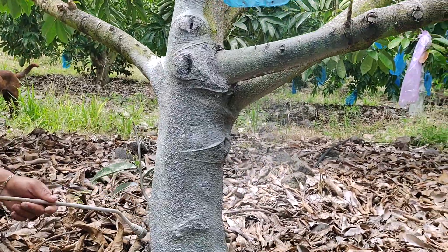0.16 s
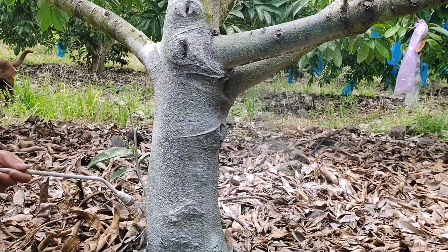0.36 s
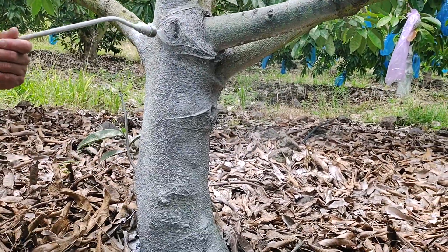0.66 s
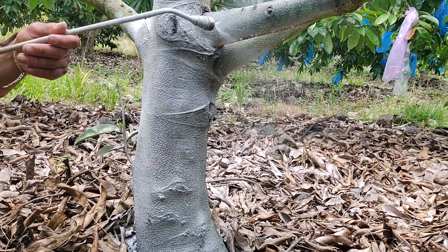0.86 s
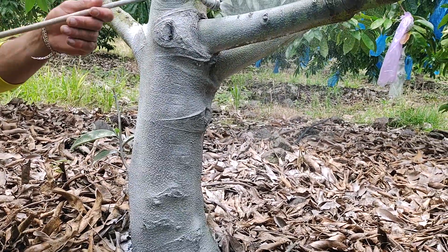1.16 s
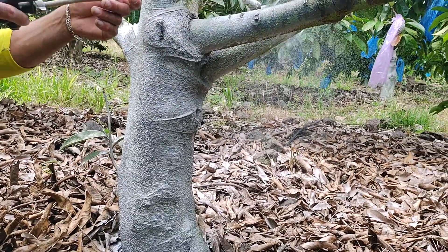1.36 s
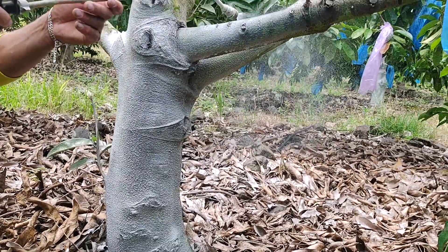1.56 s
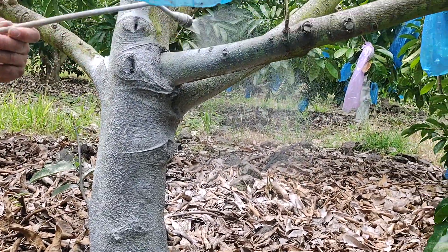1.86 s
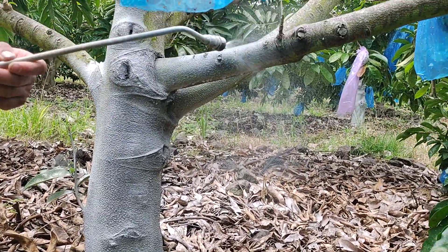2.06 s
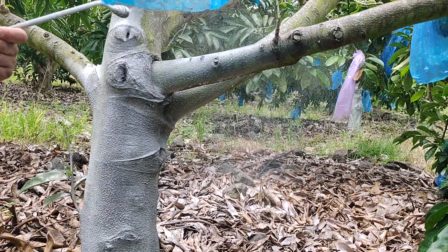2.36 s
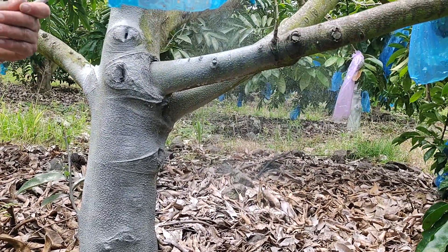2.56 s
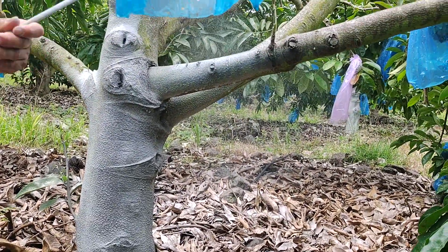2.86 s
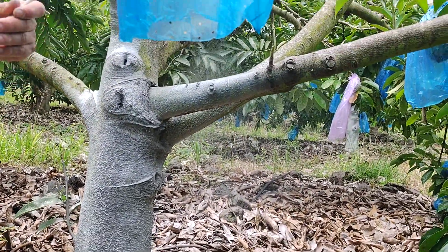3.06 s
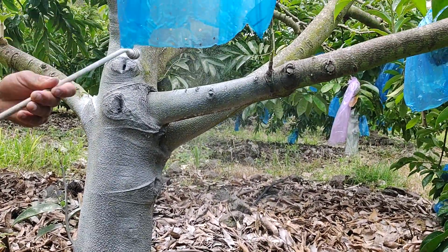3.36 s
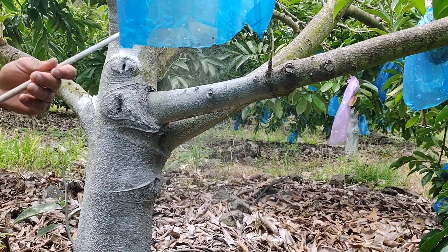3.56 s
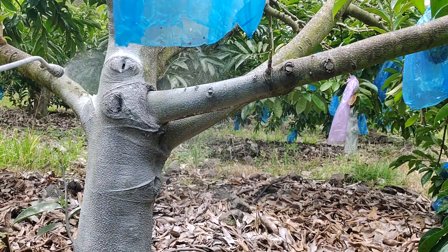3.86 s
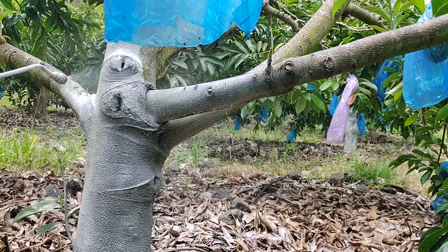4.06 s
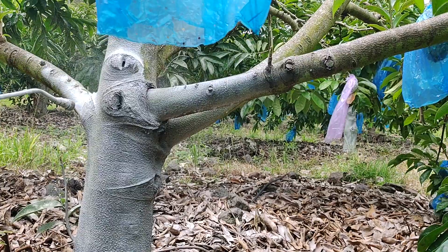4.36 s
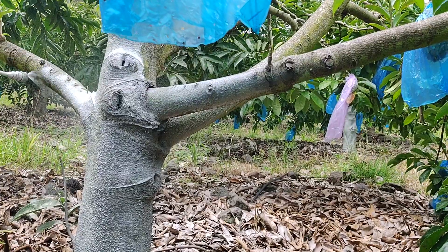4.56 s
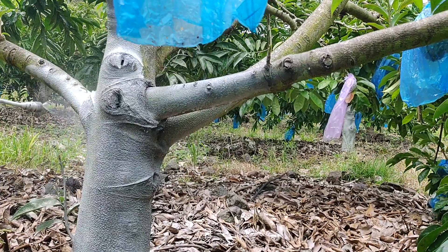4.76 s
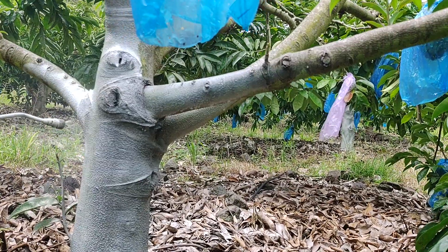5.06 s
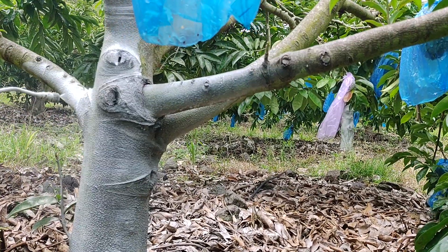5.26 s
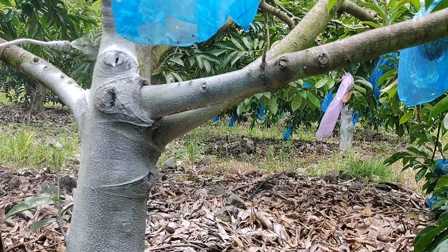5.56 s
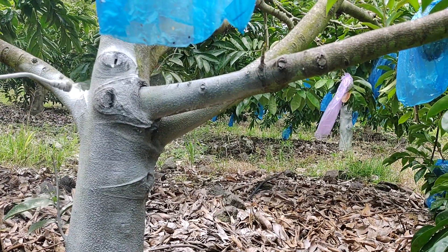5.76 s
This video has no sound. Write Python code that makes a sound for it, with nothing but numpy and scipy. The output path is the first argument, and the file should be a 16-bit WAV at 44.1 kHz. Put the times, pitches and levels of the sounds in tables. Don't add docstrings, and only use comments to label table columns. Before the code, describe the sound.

A hand-held sprayer hisses in uneven, close spurts over tree bark and dry leaves, with small cracks, drips and a few sharp valve snaps outdoors.

```python
import sys
import numpy as np
from scipy import signal
from scipy.fft import rfft, irfft, next_fast_len
from scipy.io import wavfile
from scipy.ndimage import uniform_filter1d, map_coordinates

SR = 44100
rng = np.random.default_rng(int(sys.argv[2]) if len(sys.argv) > 2 else 0)


def master_out(mix):
    frames = np.transpose(np.atleast_2d(mix))
    ceiling = np.clip(frames, -1, 1)
    pcm = np.round(ceiling * 32767).astype(np.int16)
    wavfile.write(sys.argv[1], SR, pcm)


def to_linear_factor(level_db):
    exponent = np.asarray(level_db, float) / 20
    return 10 ** exponent


N = 260190

# (frequency [Hz], density [dB per Hz])
RUMBLE = [(12, -51), (22, -26), (43, -13), (112, -2), (224, -8.5), (290, -13), (400, -18.5), (738, -15.5),
          (1300, -20.5), (2400, -33.5), (3600, -76)]
# (frequency [Hz], left-right likeness [0-1])
RUMBLE_ALIKE = [(30, 0.29), (60, 0.94), (130, 0.91), (290, 0.88), (640, 0.28), (1200, 0.45)]
# (frequency [Hz], lead of the left port [rad])
RUMBLE_LEAD = [(150, 0), (430, 0.58), (700, 2), (1120, 4)]
# (time [s], flow [dB], aim at the bark [dB])
FLOW = [(0, -48, 8.5), (.06, -44, -1), (.4, -49, 3), (.62, -45, 5.5), (.8, -47, -0.5), (1.01, -45.5, 5),
        (1.18, -49.5, 0), (1.3, -46.5, 0.5), (1.69, -44.5, 2.5), (2.02, -46, 4.5), (2.42, -51.5, -1),
        (3.1, -54, 4), (3.76, -52.5, 0), (4.1, -52.5, 3), (4.38, -55.5, 9), (5.1, -48.5, 1.5),
        (5.71, -49, -4.5), (5.9, -49.5, 1.5)]
# (centre [s], rise [dB], half width [s], aim [dB])
SURGES = [(0.118, 6, 0.04, 4.5), (.19, 4, 0.012, -2), (.34, 2, 0.071, -10), (.47, 2.5, 0.085, -2),
          (.71, 6.5, 0.037, 2.5), (.87, 2, 0.02, 6), (1.36, 5.5, 0.043, -10), (1.44, 4.5, 0.042, -11),
          (1.611, 5.5, 0.026, -2), (1.755, 3.5, 0.077, -4), (1.83, 4, 0.088, -2.5), (1.919, 8, 0.042, -5),
          (1.971, 7.5, 0.032, -3.5), (2.1, 2, 0.014, -6), (2.21, 2, 0.016, -7), (2.75, 4, 0.052, 5),
          (3.2, 0.5, 0.015, -4), (3.32, 3.5, 0.041, 9), (3.488, 7.5, 0.033, 4.5), (3.6, 7.5, 0.13, 4),
          (3.891, 9, 0.086, 0.5), (4.009, 8, 0.049, 2), (4.22, 2, 0.047, -8), (4.608, 6, 0.11, -7.5),
          (4.85, 0.5, 0.028, -6), (5.26, 3.5, 0.082, 2), (5.36, 3.5, 0.04, 0.5), (5.52, 3.5, 0.11, 2.5),
          (5.817, 6, 0.042, -2)]
# (centre [s], loss [dB], half width [s])
SHADOWS = [(.3, 1, 0.081), (1.18, 3, 0.05), (2.55, 9, 0.15), (2.95, 1, 0.081), (3.25, 7, 0.04),
           (3.1, 5, 0.051), (3.76, 11, 0.026), (4.14, 4, 0.055), (4.37, 8, 0.083), (4.73, 10, 0.075),
           (4.93, 13, 0.076), (5.71, 9, 0.028), (4.54, 8, .04), (5.34, 6, 0.065)]
# (frequency [Hz], level [dB])
SHADOW_BAND = [(4600, -28), (5200, -16), (6300, 4), (7400, -20), (8300, -30), (11500, -30), (13000, 3),
               (14300, -30)]
# (time [s], lead [ms])
LEAD = [(0, .5), (.3, .48), (.42, .2), (1.2, .13), (1.3, .48), (2.05, .48), (2.2, .21), (3.8, .2),
        (3.95, .3), (5.1, .28), (5.25, .5), (5.9, .52)]
# (time [s], delay [ms], share [0-1])
MIRROR = [(0, 1.3, .15), (.8, 1.22, .2), (1.5, 1.5, .1), (2.5, 1.3, .35), (2.64, 1.04, .45),
          (3.02, 1.0, .5), (3.06, .57, .65), (3.3, .57, .6), (3.8, 1.1, .2), (4.3, .82, .3),
          (4.47, 1.0, .35), (4.75, 1.0, .3), (5.2, 1.2, .2), (5.9, 1.3, .2)]
# (frequency [Hz], density [dB per Hz])
DRUMMING = [(700, -17), (1050, -5), (1420, -3), (1540, 4), (1700, 2.5), (1850, 7), (2300, -14)]
# (frequency [Hz], density [dB per Hz])
SPATTER = [(1300, -66), (1750, -14), (2000, -5), (2400, -3), (3000, 0), (4200, 0.5), (5200, -4.5),
           (7500, -22)]
# (frequency [Hz], density [dB per Hz])
SWIRL = [(3200, -57), (4600, -4), (5500, 2), (7100, 4), (8300, 1.5), (10500, -15.5)]
# (frequency [Hz], density [dB per Hz])
MIST = [(6000, -22), (8200, -2), (9500, -1), (11000, -1), (13000, -2.5), (15000, 1), (15800, -5.5),
        (16000, -68)]
# (time [s], level [dB])
GRAZE = [(0, -5.5), (.5, -2.5), (.9, 1), (1.3, -1), (1.6, -1), (2.1, -2.5), (2.6, 1.5), (3.1, 2),
         (3.5, 0.5), (3.85, -3.5), (4.3, -0.5), (4.7, -3.5), (5.1, -0.5), (5.5, -0.5), (5.9, -0.5)]
# (frequency [Hz], level [dB])
GRAZE_BAND = [(2900, -33), (3250, 3.5), (3800, -1.5), (4600, 1), (5300, -28), (7000, -120)]
# (value at the usual flow [dB], per flow [dB/dB], per aim [dB/dB])
DRUMMING_LAW, SWIRL_LAW = (-60.5, 1.47, 0.88), (-48.5, 1.3, -0.39)
MIST_LAW, PAN_LAW = (-46, 0.96, -0.14), (5.9, -0.51, 0.18)
# (centre [s], half width [s], from [Hz], to [Hz], level [dB])
HOLLOWS = [(.12, .05, 2900, 2700, -55), (.33, .1, 2400, 2300, -59), (.7, .05, 2600, 2700, -55),
           (.98, .16, 1690, 1580, -56), (1.39, .065, 7300, 7400, -49), (1.62, .03, 7300, 7300, -53),
           (1.75, .035, 7300, 7400, -49), (.7, .03, 7000, 7400, -54), (1.7, .12, 2300, 2700, -52),
           (2.08, .07, 2620, 2600, -58), (2.18, .09, 2500, 2450, -58), (2.61, .07, 3750, 3950, -58),
           (2.84, .07, 2150, 2150, -61), (2.25, .08, 2150, 2150, -60), (2.6, .1, 2200, 2150, -65),
           (2.9, .11, 2950, 2800, -61), (3.0, .06, 4050, 3900, -57), (3.1, .09, 2050, 2150, -64),
           (3.17, .08, 3800, 3700, -61), (3.55, .08, 2300, 2100, -59), (3.74, .05, 3900, 3700, -63),
           (4.4, .09, 4600, 3600, -68), (4.36, .06, 2250, 2250, -66), (4.56, .06, 3000, 2950, -63),
           (4.8, .06, 3250, 3300, -62), (4.87, .14, 2350, 2000, -63), (5.2, .1, 3000, 3100, -59),
           (5.82, .03, 2200, 2800, -54), (5.46, .12, 3000, 3100, -58), (2.0, .05, 3000, 2900, -55)]
# (time [s], peak [dB], left-right [dB], high part [dB])
SPITS = [(0.11, -25.5, 7, -12), (0.699, -24, 6, -21), (1.361, -16.5, 3, -26), (1.73, -17, -7.5, -24),
         (1.764, -19.5, 13, -24), (2.737, -24, 3, -29), (3.296, -28, 0, -12), (3.421, -31, 6, -13),
         (3.445, -29, 4, -16), (3.476, -23, 7, -14), (3.496, -28, 2.5, -20), (3.512, -35, 1, -18),
         (4.01, -42, 3, -12), (5.351, -23, 8, -25)]
# (time [s], peak [dB],
# frequency [Hz], t60 [s])
PLINKS = [(0.1326, -30.5, 2870, 0.036), (0.3755, -34, 2370, 0.028), (0.464, -27, 2570, 0.018),
          (0.62, -31, 1900, 0.027), (0.78, -34, 2750, 0.03), (1.0937, -33, 3100, 0.034),
          (1.448, -30, 2200, .025), (1.671, -30, 2350, 0.026), (1.771, -24.5, 2250, 0.036),
          (1.9145, -28.5, 2400, 0.039), (2.037, -34, 2020, 0.03), (2.2994, -40, 2250, 0.04),
          (3.4845, -32, 2200, 0.03), (5.2675, -31, 3750, 0.022), (5.268, -33, 4600, .015),
          (5.268, -33, 7400, .015), (5.269, -28, 3000, 0.03)]
# (time [s], peak [dB], left-right [dB], low part [dB], t60 [s])
TICKS = [(0.8222, -21.5, 5, -23, 0.0043), (0.8634, -18, 2, -20, 0.0025), (.868, -28, 2, -20, .004),
         (0.6, -28, 4, -10, .006), (0.62, -26, 3, -15, .006), (0.96, -25, 3, -8, .005),
         (.979, -32, 4, -14, .006), (0.86, -32, 7, -16, .006), (0.9293, -24, 4, -6, 0.005),
         (1.1067, -27, 14, -11, .004), (1.6716, -31, 10, -8, 0.004), (1.697, -20, 0, -6, .006),
         (1.6097, -27, 0, -6, 0.0055), (1.8911, -24, 0, -12, .005), (2.0813, -28, 2, -10, .005),
         (2.3141, -31, 3, -12, .004), (5.502, -31, 1, -10, .005), (1.772, -9, -1.5, -20.5, 0.0078),
         (2.2, -24, 1, -26, .005), (2.359, -31, -5, -27, .004), (2.4497, -32.5, 9, -10, .004),
         (3.134, -28, 15, -27, 0.0023), (3.4777, -25.5, -2, 0, .005), (3.487, -27, -2, -4, .005),
         (3.503, -30, 2, -4, .006), (4.308, -38, 6, 6, 0.005), (4.832, -32, 7, -6.5, 0.01),
         (5.845, -26, -4, -10, 0.0048), (0.5948, -30, 0, -1, 0.0098), (.262, -25, 7, -9, 0.0055),
         (.452, -24, 11, -27, 0.01), (1.326, -22, 2, -10, .005), (1.4478, -20, 4, -8, .005),
         (0.28, -30, 8, -12, .005)]
# (time [s], peak
# [dB], left-right [dB], frequency [Hz], t60 [s])
KNOCKS = [(0.59, -32, -20, 245, 0.018), (.581, -38, -16, 124, 0.061), (0.61, -47.5, -10, 428, 0.096),
          (0.6223, -40, -13, 190, 0.029), (0.62, -44, -8, 230, .025), (.695, -44, -3, 494, 0.12),
          (0.66, -47, -8, 860, 0.049), (2.038, -35.5, 13, 575, 0.056), (2.08, -45, 4, 78, 0.17),
          (2.045, -51, 2, 510, 0.053), (2.052, -37.5, 12, 360, 0.063), (2.067, -43, 3, 500, 0.1),
          (2.086, -45, 5, 100, 0.15), (2.055, -41.5, -2, 223, 0.15), (2.041, -43, 4, 1250, 0.022),
          (2.058, -43, -1, 590, 0.031), (2.122, -47, -2, 190, 0.074), (2.742, -42, 5, 146, 0.088),
          (2.8, -51.5, -13, 42.5, 0.49), (3.477, -40.5, 6, 1070, 0.029), (3.984, -28.5, 27, 606, 0.0047),
          (5.2677, -28, -1, 2200, 0.018), (5.267, -44, 2, 1400, 0.016)]
# (time [s], peak [dB], left-right [dB], high part [dB], rattle [s])
SNAPS = [
    (3.2752, -16.5, 4.5, -10.5, 0.0045),
    (3.2891, -17.5, 9, -11.5, 0.0039),
    (3.985, -14, 6, -6, 0.0022),
    (5.268, -17.5, 4, -17.5, 0.0014),
]
# (frequency [Hz], density [dB per Hz])
HOUSING = [(1100, -24), (1500, -9), (2300, -6), (2650, -6.5), (3100, 4.5), (3450, -5), (3800, -5),
           (4500, -3), (5300, -11), (7500, -46)]
# (frequency [Hz], width [Hz], level [dB])
VALVE_MODES = [(3530, 650, 3), (6680, 250, -50), (9100, 160, -27), (9400, 170, -28), (10850, 260, 0),
               (11960, 200, 11.5), (15250, 310, 5)]
# (frequency [Hz], left port minus right port [dB])
PORTS = [(600, -4), (1100, 9), (1750, 13), (2450, 14.5), (3100, 3.5), (4000, 0), (5300, -7), (6500, -2),
         (8000, -0.5), (12500, -2), (15000, 0.5)]

RUMBLE_DB, USUAL_FLOW_DB = -50.5, -47
SHADOW_ON_MIST, SHADOW_ON_PAN, SHADOW_ON_BAND = 0.25, 0.63, 0.37
HOLLOW_WIDTH_HZ, HOLLOW_USUAL_HZ, HOLLOW_PAN_DB = 190, 2800, 2
SPIT_LOW_DB, SPIT_HOLD_S = -12.5, 0.0073
TICK_HIGH_DB, TICK_BRIGHT_DB = -18, 8
SNAP_LOW_DB = -11.5
TOP_HZ = 15920


def unit(x):
    return x / np.sqrt(np.mean(x ** 2) + 1e-20)


def along(points, hz):
    f, v = np.transpose(points)
    return np.interp(np.log(hz + 1), np.log(f + 1), v)


def curves(rows):
    s, *cols = np.transpose(rows)
    return [np.interp(np.arange(N) / SR, s, c) for c in cols]


def wobble(rate):
    knots = rng.standard_normal(int(N * rate / SR) + 4)
    return map_coordinates(knots, [np.arange(N) * rate / SR])


def filtered(x, response):
    m = next_fast_len(N + 8192)
    return irfft(rfft(x, m) * response(np.fft.rfftfreq(m, 1 / SR)), m)[..., :N]


def coloured(x, spectrum):
    points = [(spectrum[0][0] / 2, -120)] + spectrum
    return filtered(x, lambda hz: to_linear_factor(along(points, hz)))


def patchy(patchy_db, channels):
    z = signal.stft(rng.standard_normal((channels, N)), nperseg=512)[2]
    field = uniform_filter1d(rng.standard_normal(z.shape[1:]), size=6, axis=0)
    field = uniform_filter1d(field, size=10, axis=1)
    return signal.istft(z * to_linear_factor(patchy_db * unit(field)), nperseg=512)[1][:, :N]


def sides(pan_db):
    return to_linear_factor(np.array([pan_db / 2, -pan_db / 2]))


def late(x, ms):
    lag = np.round(ms * SR / 1000).astype(int)
    return x[np.clip(np.arange(N) - lag, 0, N - 1)]


def rumble():
    def turn(hz):
        return np.arccos(np.clip(along(RUMBLE_ALIKE, hz), -1, 1)) / 2

    def mid_side(hz):
        return to_linear_factor(along(RUMBLE, hz)) * [np.cos(turn(hz)), np.sin(turn(hz))]

    mid, side = filtered(patchy(0.39, channels=2), mid_side)
    pair = np.array([mid + side, mid - side])
    pair = filtered(pair, lambda hz: np.exp(.5j * along(RUMBLE_LEAD, hz) * [[1], [-1]]))
    return to_linear_factor(RUMBLE_DB + 0.83 * wobble(2.78)) * unit(pair)


def jet():
    (flow_db, aim_db), t = curves(FLOW), np.arange(N) / SR
    for s, rise_db, width_s, turn_db in SURGES:
        bell = np.exp(-((t - s) / width_s) ** 2)
        flow_db, aim_db = flow_db + rise_db * bell, aim_db + turn_db * bell
    return flow_db - USUAL_FLOW_DB, aim_db


def shadow():
    t = np.arange(N) / SR
    return sum(loss_db * np.exp(-((t - s) / width_s) ** 2) for s, loss_db, width_s in SHADOWS)


def droplets(direct, patchy_db):
    near, left, right = patchy(patchy_db, channels=3)
    lag_ms = curves(LEAD)[0] + .015 * wobble(2.5)
    shared = np.array([late(near, lag_ms), near])
    return np.sqrt(direct) * shared + np.sqrt(1 - direct) * np.array([left, right])


def patter(count, centre_hz, cycles, spread_db):
    when, pitch, size, side = rng.random(count), *rng.standard_normal((3, count))
    hz, t = centre_hz * np.exp(.35 * pitch)[:, None], np.arange(400) / SR
    envelope = np.exp(-t * hz / cycles) * (1 - np.exp(-t * hz / 2))
    grains = to_linear_factor(spread_db * size)[:, None] * np.sin(2 * np.pi * hz * t) * envelope
    at = (when * N).astype(int)[:, None] + np.arange(400)
    pair = [np.bincount(at.ravel(), (grains * g[:, None]).ravel(), N)[:N] for g in sides(4 * side)]
    return unit(np.array(pair))


def mirrored(pair):
    delay_ms, share = curves(MIRROR)
    echo = np.array([late(pair[0], delay_ms), 0.8 * late(pair[1], 1.123 * delay_ms)])
    return (pair + share * echo) / np.sqrt(1 + share ** 2)


def spray():
    (flow_db, aim_db), loss_db = jet(), shadow()
    laws = (DRUMMING_LAW, SWIRL_LAW, MIST_LAW, PAN_LAW)
    drumming_db, swirl_db, mist_db, pan_db = (db + a * flow_db + b * aim_db for db, a, b in laws)
    flutter_db = 0.76 * wobble(30) + 1.0 * wobble(80) + 0.52 * wobble(250)

    drumming = unit(coloured(droplets(0.85, patchy_db=3.5), DRUMMING))
    leaf_drops = patter(count=1500, centre_hz=3016, cycles=9.2, spread_db=4.0)
    spatter = mirrored(droplets(0.45, patchy_db=1.0) + to_linear_factor(-20.5) * leaf_drops)
    spatter = unit(coloured(spatter, SPATTER))
    spatter = spatter + (to_linear_factor(curves(GRAZE)[0]) - 1) * coloured(spatter, GRAZE_BAND)
    fine_drops = patter(count=1500, centre_hz=6740, cycles=6.0, spread_db=8)
    swirl = unit(coloured(droplets(0.08, patchy_db=2.2) + to_linear_factor(-15.5) * fine_drops, SWIRL))
    mist = unit(coloured(droplets(0.21, patchy_db=2.5), MIST))

    coarse = to_linear_factor(drumming_db) * drumming + to_linear_factor(flow_db - 44.5) * spatter
    fine = to_linear_factor(swirl_db - loss_db) * swirl + to_linear_factor(mist_db - SHADOW_ON_MIST * loss_db) * mist
    hiss = coarse * sides(0.47 * pan_db) + fine * sides(pan_db + SHADOW_ON_PAN * loss_db)
    hiss = to_linear_factor(flutter_db) * hiss
    return hiss - (1 - to_linear_factor(-SHADOW_ON_BAND * loss_db)) * coloured(hiss, SHADOW_BAND + [(17000, -120)])


def hollows():
    out, sway = np.zeros(N + SR), wobble(HOLLOW_WIDTH_HZ) + 1j * wobble(HOLLOW_WIDTH_HZ)
    for s, width_s, from_hz, to_hz, db in HOLLOWS:
        at = np.arange(round((s - 2 * width_s) * SR), round((s + 2 * width_s) * SR))
        u = (at / SR - s) / width_s
        hz = from_hz + (to_hz - from_hz) * np.clip(u + 1, 0, 2) / 2
        speed = (from_hz / HOLLOW_USUAL_HZ) ** (2 if from_hz > HOLLOW_USUAL_HZ else 1)
        own_sway = sway[np.round(at * speed + from_hz * 20).astype(int) % N]
        hum = np.real(own_sway * np.exp(2j * np.pi * np.cumsum(hz) / SR))
        out[at] += to_linear_factor(db) * np.exp(-u ** 4) * hum
    return out[:N] * sides(HOLLOW_PAN_DB)[:, None]


def bursts(rows, low):
    parts, t = np.zeros((3, 2, N + SR)), np.arange(SR // 8) / SR
    for s, db, pan_db, low_db, high_db, rise, hold, t60 in rows:
        decay_db = 60 * np.maximum(t - hold, 0) / max(t60, .002)
        shape = to_linear_factor(db - decay_db) * (1 - np.exp(-t / rise))
        crack = shape * (0.75 * rng.standard_normal(len(t)) + 0.61 * rng.standard_normal((2, len(t))))
        if rise < .001:
            crack[:, :4] += 0.9 * to_linear_factor(db) * np.array([1, 1, -1, -1])
        strengths = to_linear_factor(np.array([low_db + 10.0, -5, high_db + 11.5]))[:, None, None]
        start = round(s * SR)
        parts[:, :, start:start + len(t)] += strengths * crack * sides(pan_db)[:, None]
    parts[:, 1] = np.roll(parts[:, 1], -13, axis=-1)
    return sum(coloured(p[:, :N], c) for p, c in zip(parts, (low, SWIRL, MIST)))


def air_spits():
    rows = [(s, db - 6.5, pan_db, SPIT_LOW_DB, high_db, .002, SPIT_HOLD_S, .03)
            for s, db, pan_db, high_db in SPITS]
    return bursts(rows, SPATTER)


def damped_modes(rows):
    out, t = np.zeros((2, N + SR)), np.arange(SR // 4) / SR
    for s, db, pan_db, hz, t60 in rows:
        puff = unit(uniform_filter1d(rng.standard_normal(len(t)), size=120))
        rough = 1 + 0.51 * np.minimum(t / .008, 1) * puff
        envelope = to_linear_factor(db - 60 * t / t60) * (1 - np.exp(-t / 0.00056))
        blow = envelope * np.sin(2 * np.pi * hz * t) * rough
        out[:, round(s * SR):round(s * SR) + len(t)] += blow * sides(pan_db)[:, None]
    return out[:, :N]


def plinks():
    return damped_modes([(s, db - 4.0, 0, hz, t60) for s, db, hz, t60 in PLINKS])


def leaf_cracks():
    rows = []
    for s, db, pan_db, low_db, t60 in TICKS:
        high_db = TICK_HIGH_DB + TICK_BRIGHT_DB * np.log2(0.0041 / t60)
        rows.append((s, db + 0.5, pan_db, low_db, high_db, .0001, .0003, t60))
    return bursts(rows, SPATTER)


def knocks():
    return damped_modes(KNOCKS)


def snaps():
    def body(hz):
        response = .5
        for k, (centre, width, db) in enumerate(VALVE_MODES):
            damping = 1j * hz * width
            response = response + (-1) ** k * to_linear_factor(db) * damping / (centre ** 2 - hz ** 2 + damping)
        return response

    rows = [(s, db, pan_db, SNAP_LOW_DB, high_db, .0001, rattle, .012)
            for s, db, pan_db, high_db, rattle in SNAPS]
    direct = filtered(bursts(rows, HOUSING), body)
    t = np.arange(SR // 4) / SR
    tail = rng.standard_normal((2, len(t))) * (to_linear_factor(-60 * t / .045) + to_linear_factor(-22 - 60 * t / .2))
    tail = tail / np.linalg.norm(tail[0])
    return direct + to_linear_factor(-5.5) * signal.fftconvolve(direct, tail, axes=1)[:, :N]


def scene():
    near = spray() + hollows() + air_spits() + plinks() + leaf_cracks() + knocks() + snaps()
    return rumble() + filtered(near, lambda hz: sides(along(PORTS, hz)) * (hz < TOP_HZ))


def ducked(x, knee_db, ratio, release_db):
    power = np.abs(uniform_filter1d(np.mean(x ** 2, axis=0), size=200))
    level_db = 10 * np.log10(power + 1e-12)
    climb = release_db * np.arange(N) / SR
    cut_db = np.maximum.accumulate(ratio * np.maximum(level_db - knee_db, 0) + climb) - climb
    return x * to_linear_factor(-uniform_filter1d(np.roll(cut_db, 400), size=400))


def top_cut(x):
    return signal.sosfilt(signal.butter(12, 17000, fs=SR, output="sos"), x)


def record(dry):
    steady = ducked(dry, knee_db=-26.5, ratio=0.58, release_db=6.5)
    mix = steady / (1 + np.abs(steady / .46) ** 6) ** (1 / 6)
    return top_cut(mix)


dry = scene()
out = record(dry)
master_out(out)
```